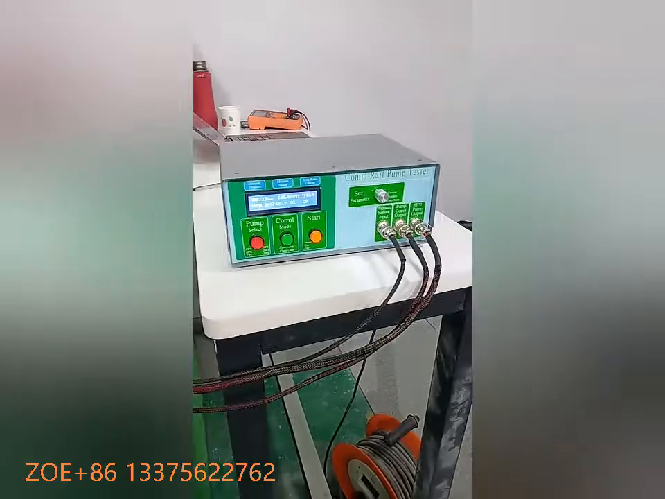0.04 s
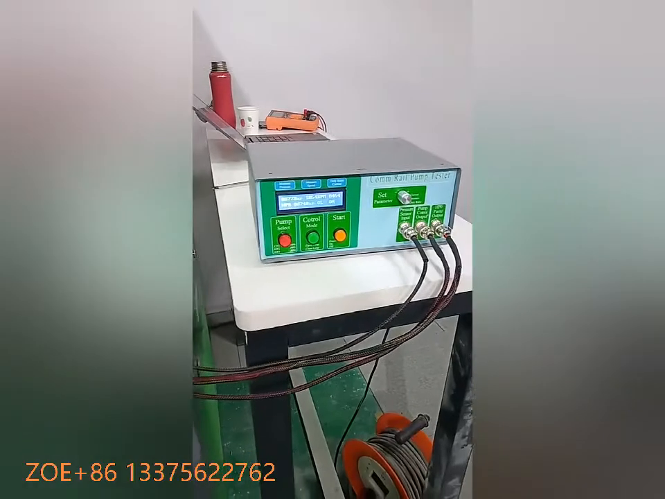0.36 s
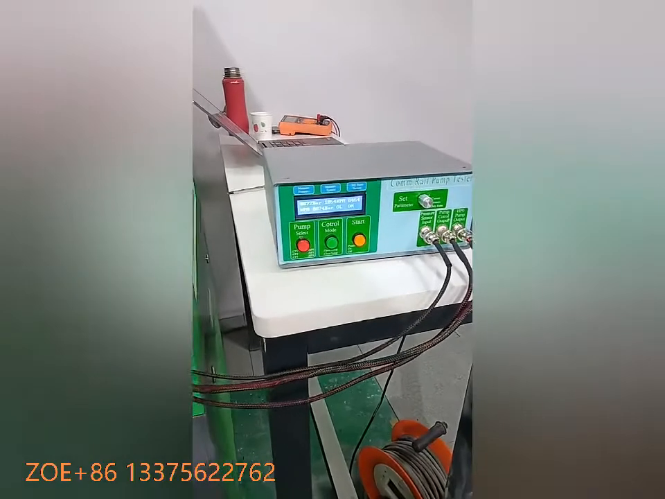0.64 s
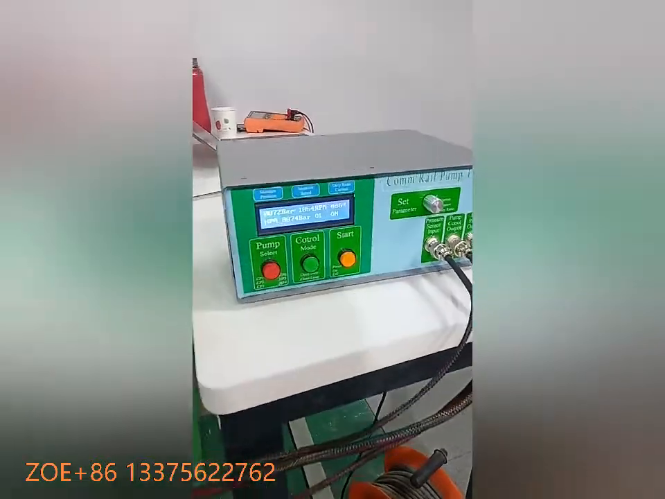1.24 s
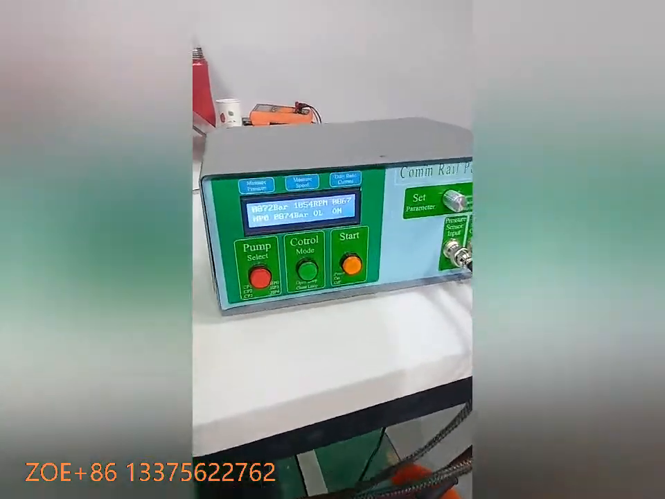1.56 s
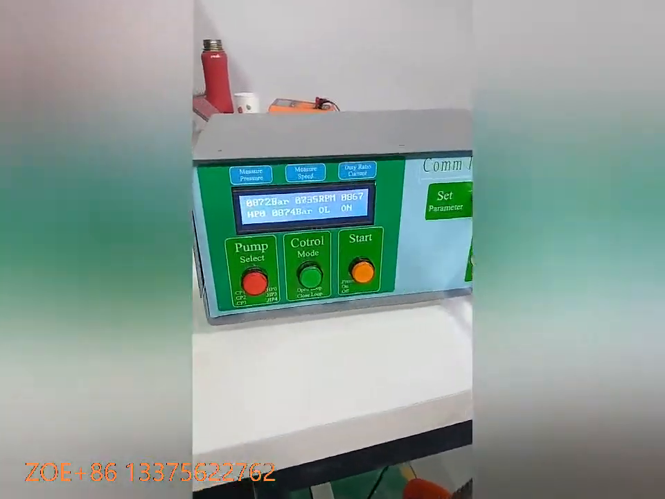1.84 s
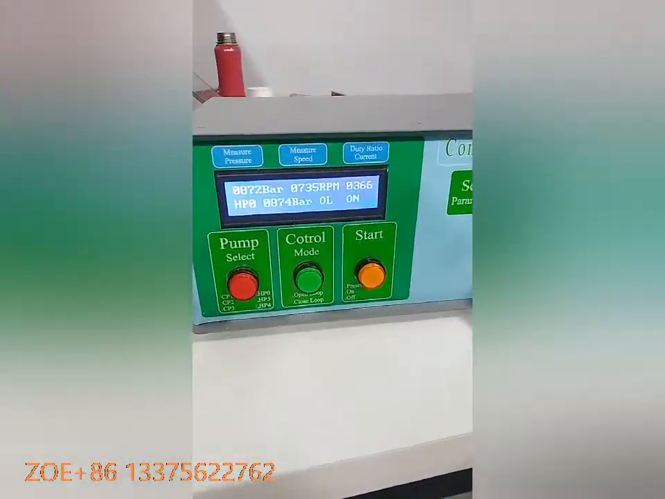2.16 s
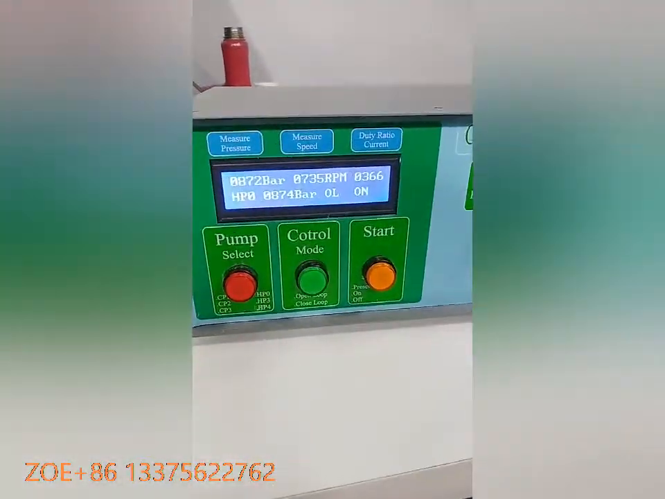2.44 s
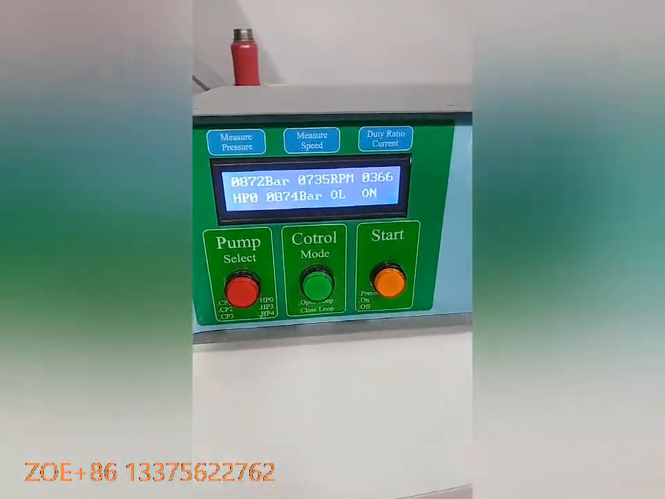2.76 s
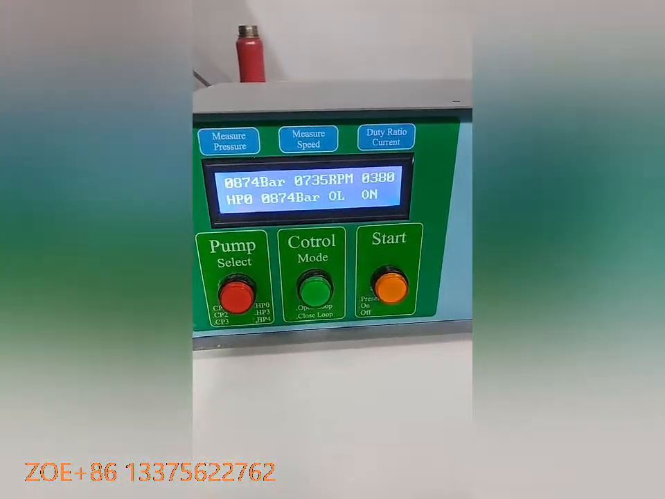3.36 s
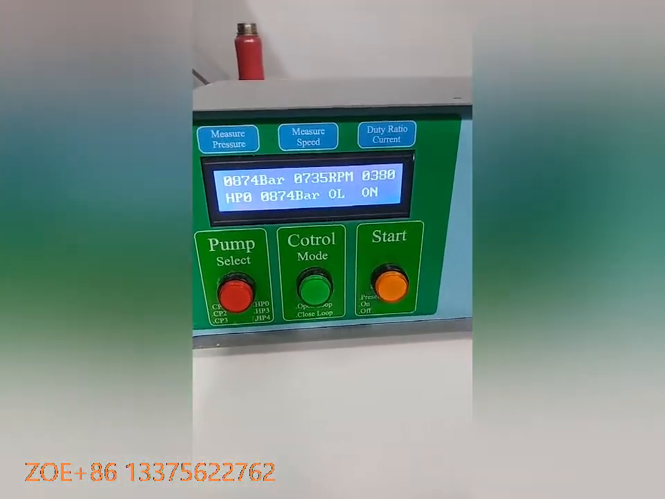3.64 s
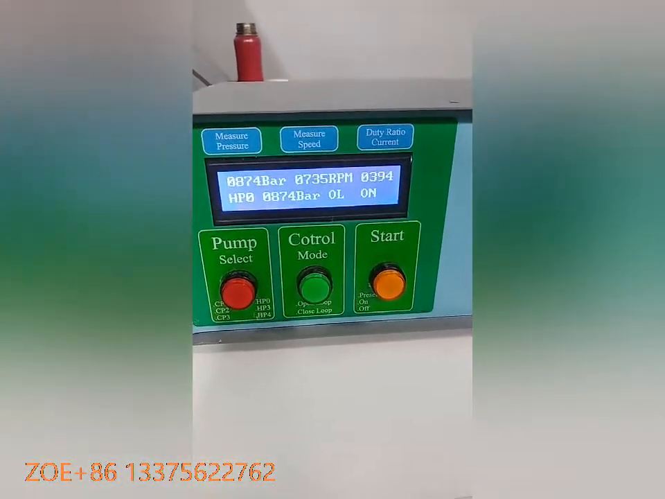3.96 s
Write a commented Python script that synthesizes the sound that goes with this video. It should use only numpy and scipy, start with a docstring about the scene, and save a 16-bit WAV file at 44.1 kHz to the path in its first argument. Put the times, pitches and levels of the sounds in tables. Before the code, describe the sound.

A test bench pump fades in during the first half second and drones at constant speed until the end at 4 seconds, with fast clatter, rattling, hiss and a thin high whine. Soft knocks come near 0.7, 1.9 and 2.6 seconds. Faint high squeaks occur around 0.9 and 1.5 seconds, and brief chirps mostly from 2 seconds on. The tone shifts slightly as the microphone moves closer.

```python
"""High-pressure pump on a test bench

A pump runs at constant speed in a workshop, heard by a listener who moves slowly closer. Harmonics
of the shaft rate drone, plungers and gears clatter alike on every turn, the housing rattles and the
bench panels resonate. Fuel hisses and chirps in the lines under a thin whine near 5 kHz, with a few
soft knocks and high squeaks. The sound fades in at the start."""
import sys
import numpy as np
from scipy import signal
from scipy.fft import rfft, irfft
from scipy.io import wavfile
from scipy.ndimage import uniform_filter1d

SR = 44100
rng = np.random.default_rng(int(sys.argv[2]) if len(sys.argv) > 2 else 0)


def file_out(sig):
    """Save sig as 16-bit WAV at sys.argv[1]."""
    # one column per channel
    cols = np.atleast_2d(sig).T
    # limit, then scale
    lim = np.clip(cols, -1, 1)
    pcm = np.round(lim * 32767).astype(np.int16)
    wavfile.write(sys.argv[1], SR, pcm)


N = 176400


def undb(db):
    """Amplitude ratio of a level in decibels."""
    return 10 ** (np.asarray(db) / 20)


def level(x, db):
    """Scaling to an rms level in dB."""
    return x * undb(db) / np.sqrt(np.mean(x ** 2))


def walk(rate):
    """Random modulation: values held 1 / rate seconds and smoothed twice, with a spread near 1."""
    hold = int(SR / rate)
    steps = rng.standard_normal(400)[np.arange(N) // hold % 400]
    return 1.3 * uniform_filter1d(uniform_filter1d(steps, hold), hold)


def colour(x, points):
    """Minimum-phase filter through (Hz, dB) points, made causal by folding the cepstrum."""
    hz, db = np.array(points, float).T
    f = np.maximum(np.fft.rfftfreq(N, 1 / SR), 1)
    gain = undb(np.interp(np.log(f), np.log(hz), db))
    cepstrum = irfft(np.log(gain), N)
    cepstrum[1:N // 2] *= 2
    cepstrum[N // 2 + 1:] = 0
    return irfft(rfft(x) * np.exp(rfft(cepstrum)), N)


def ring(hz, width_hz):
    """Narrow-band noise: one steep resonance under random excitation, at rms 1."""
    detuning = (np.fft.rfftfreq(N, 1 / SR) - hz) / (width_hz / 2)
    return level(irfft(rfft(rng.standard_normal(N)) / (1 + detuning ** 2), N), 0)


def swell(x, at, width):
    """Gaussian bump of height 1, two standard deviations wide."""
    return np.exp(-2 * ((x - at) / width) ** 2)


def stereo(mid, side):
    """Left and right as the sum and difference of mid and side."""
    return np.array([mid + side, mid - side])


def drone(turns, near, waver=.059):
    """Periodic motion radiates harmonics of the shaft rate; their balance depends on where one stands."""
    # Each row: shaft multiple (rounded in use), relative level in dB from afar, the same from close by.
    harmonics = [(5, -29, -18), (6, -3.5, -7), (7, -20, -19.5), (9, -18, -17.5), (10, -4, -7),
                 (11, -19, -22), (12, 0.5, 1), (15, -18, -13.5), (16, -9, -12), (17, -7, -10),
                 (18, -3.5, -8.5), (19, -17, -18), (20, -4.5, -12), (21, -11, -33), (22, -21, -20.5),
                 (23, -10, -10.5), (24, -4.5, -3), (25, -14, -15), (27, -27, -14.5), (28, -16, -19.5),
                 (30, -18.5, -19.5), (31, -20, -24), (34, -16, -15.5), (35, -17.5, -25), (42, -14.5, -19),
                 (57, -27, -25.5), (58, -27, -21), (90.56, -16.5, -17), (94.8, -22, -19), (132, -22, -14.5)]
    out = 0
    for multiple, far_db, near_db in harmonics:
        gain = undb(far_db + (near_db - far_db) * near) * (1 + waver * (walk(2.94) + 1j * walk(2.2)))
        cycles = round(multiple) * turns + rng.random()
        out = out + np.real(gain * np.exp(2j * np.pi * cycles))
    return level(out, db=-27.5)


def clatter(turns, sets=4, impacts=150, spread_db=3, mix_hz=.155):
    """Impacts at fixed shaft angles form periodic pulse trains; their mix shifts as the listener moves."""
    # Each row: frequency in Hz, relative spectral density in dB.
    spectrum = [(300, -36.5), (420, -1.5), (520, -9), (780, 1.5), (950, -3), (1250, -2.5), (1650, -3.5),
                (2000, -9), (2350, -9), (2850, -1), (3700, -5), (4500, -10), (5600, -14.5), (8000, -39)]
    samples = np.arange(N)
    whole_turns = np.arange(-1, turns[-1] + 1)[:, None]
    out = 0
    for k in range(sets):
        angle = rng.random(impacts)
        force = rng.choice([-1, 1], impacts) * undb(spread_db * rng.standard_normal(impacts))
        at = np.interp(whole_turns + angle, turns, samples, left=N, right=N).astype(int)
        hits = np.bincount(at.ravel(), np.tile(force, len(whole_turns)), N + 1)[:N]
        out = out + hits * np.cos(2 * np.pi * mix_hz * samples / SR + np.pi * k / sets)
    return level(colour(out, spectrum), db=-33.5)


def rattle(turns, ticks_per_s=5000, spread_db=2.5, strokes_per_turn=8, depth=.16):
    """Shot noise: dense random ticks in the housing, modulated in amplitude by the strokes."""
    # Each row: frequency in Hz, relative spectral density in dB.
    spectrum = [(20, -7), (45, -6.5), (80, -1), (150, 1.5), (240, 6.5), (330, 5), (410, -2.5), (540, -1.5),
                (780, -2.5), (1000, -0.5), (1280, 3.5), (1800, -5.5), (2050, -1), (2350, -11), (2850, 0.5),
                (3700, 1), (4500, -2.5), (5600, -7.5), (6900, -11), (8000, -23.5), (14000, -23)]
    ticks = (rng.random(N) < ticks_per_s / SR) * rng.choice([-1, 1], N)
    force = undb(spread_db * rng.standard_normal(N))
    phase = 2 * np.pi * strokes_per_turn * turns
    strokes = 1 + depth * (np.cos(phase) + np.cos(phase / 2 + 2 * np.pi * rng.random())) / 2
    return level(colour(ticks * force * strokes, spectrum), db=-31)


def panels(shake, near):
    """Forced vibration: the bench's sheet panels ring at their modes, clearer from close by."""
    # Each row: frequency in Hz, half-width in Hz, level in dB from afar, the same from close by.
    modes = [(766, 19, -65, -49), (1225, 28, -57, -49), (2890, 90, -58, -58), (3354, 37, -60, -51),
             (3725, 94, -55, -49.5)]
    f, drive = np.fft.rfftfreq(N, 1 / SR), rfft(shake)
    out = 0
    for hz, half_width, far_db, near_db in modes:
        ringing = irfft(drive / (1 + 1j * (f - hz) / half_width) ** 2, N)
        out = out + level(ringing, 0) * undb(far_db + (near_db - far_db) * near)
    return out


def hiss(flicker_db=1.5):
    """Flow noise of the fuel flickers finely; scattering in the room decorrelates it between the ears."""
    # Each row of both tables: frequency in Hz, relative spectral density in dB.
    mid_spectrum = [(2500, -40), (3900, -29), (4700, 3.5), (5600, 0), (6000, 0.5), (6350, 8.5), (6850, 4),
                    (7000, -5), (7500, -1), (7750, -6), (8700, -8.5), (10000, -7.5), (12000, -9.5),
                    (14000, -12.5)]
    side_spectrum = [(3900, -68), (4300, -8), (4700, -12), (5200, -1), (6300, 7.5), (6850, 7), (7000, -1),
                     (7500, -1), (7750, -4), (8700, -7.5), (10000, -5), (14000, -11)]
    mid = level(colour(rng.standard_normal(N), mid_spectrum), db=-39)
    side = level(colour(rng.standard_normal(N), side_spectrum), db=-40)
    return stereo(mid, side) * undb(flicker_db * walk(40.3))


def whine(t, focus_hz=70, floor=.45, waver=.25, side_gain=.5, flutter_db=1.1):
    """Close tones of the drive beat in narrow-band noise; the emphasis slides from tone to tone."""
    # Tones on a grid of four shaft multiples. Each row: frequency in Hz, level in dB before weighting.
    tones = [(4651, -58), (4812, -55), (4866, -49), (4920, -44), (4974, -42.5), (5027.5, -39.5),
             (5081, -51), (5135.5, -42)]
    # Each row: time in seconds, emphasised frequency in Hz, gain of the mid signal in dB.
    emphasis = [(.3, 4940, -3), (.6, 4940, 1.5), (.8, 5120, 0), (.98, 5020, 1), (1.12, 5020, -1),
                (1.22, 4920, -8), (1.42, 5060, 1), (1.6, 4980, -4.5), (1.8, 5000, 0.5), (1.92, 4980, -5.5),
                (2.12, 5050, 2), (2.25, 5130, -2), (2.36, 5010, 1), (2.6, 5070, 3.5), (2.74, 5080, 2.5),
                (2.98, 5050, 2), (3.15, 4850, 1), (3.45, 4990, -1.5), (3.68, 4860, -5.5), (4, 4930, -2)]
    times, centres, gains_db = np.array(emphasis).T
    centre = np.interp(t, times, centres)
    mid_gain = undb(np.interp(t, times, gains_db))
    mid, side = (undb(-46) * ring(hz=5030, width_hz=200) for _ in range(2))
    for hz, db in tones:
        focus = floor + (1 - floor) * swell(centre, hz, focus_hz)
        tone = np.sqrt(2) * undb(db) * focus * np.exp(2j * np.pi * (hz * t + rng.random()))
        mid = mid + np.real(tone * (1 + waver * (walk(3.66) + 1j * walk(3.7))))
        side = side + np.real(tone * (walk(2.3) + 1j * walk(1.8))) / np.sqrt(2)
    return stereo(mid_gain * mid, side_gain * side) * undb(flutter_db * walk(30.03))


def chirps(t, length_s=.02, width_hz=200):
    """The fuel flow chirps in short bursts of narrow-band noise."""
    # Each row: time of the peak in seconds, frequency in Hz, level in dB.
    bursts = [(.65, 6280, -43), (1.735, 6120, -47), (1.87, 6000, -43), (1.955, 6040, -39),
              (2.395, 6130, -36), (2.56, 6180, -43), (2.84, 6260, -49), (3.257, 6300, -37),
              (3.345, 6480, -36), (3.517, 6500, -44), (3.555, 6200, -40), (3.6, 6170, -47),
              (3.815, 6200, -39), (3.862, 6380, -35)]
    return sum(undb(db) * swell(t, at, length_s) * ring(hz, width_hz) for at, hz, db in bursts)


def knocks(t):
    """Briefly excited resonances give soft bumps and a tick, half masked by the drone."""
    # Each row: time of the peak in seconds, frequency in Hz, width in Hz, length in seconds, level in dB.
    bumps = [(0.7, 374, 70, 0.029, -34), (0.727, 2880, 300, .014, -29), (1.881, 412, 60, 0.039, -33),
             (2.573, 364, 60, .04, -35)]
    return sum(undb(db) * swell(t, at, length) * ring(hz, width) for at, hz, width, length, db in bumps)


def squeaks(t, hz=11290, width_hz=280, side_gain=.55):
    """A very high resonance, excited by noise, sings in short spells."""
    # Each row: time of the peak in seconds, length in seconds, level of the mid signal in dB.
    spells = [(.86, 0.031, -41.5), (0.936, 0.027, -39.5), (1.0, .08, -53), (1.42, .035, -46.5),
              (1.49, .04, -53), (1.582, 0.019, -38.5), (2.36, .04, -53), (3.99, .04, -45)]
    envelope = sum(undb(db) * swell(t, at, length) for at, length, db in spells)
    return envelope * stereo(ring(hz, width_hz), side_gain * ring(hz, width_hz))


def scene(shaft_hz=13.429, wander_turns=.0011, approach_mid_s=1.54, approach_scale_s=.74):
    """Superposition: one shaft times drone, clatter and rattle; the other sounds add around them."""
    # The machine's lean to the left ear. Each row: frequency in Hz, side relative to mid in dB.
    lean = [(60, -46), (170, -43.5), (350, -66), (750, -69), (1050, -26), (1250, -13), (1450, -31.5),
            (1750, -63), (4000, -74)]
    t = np.arange(N) / SR
    near = .5 + .5 * np.tanh((t - approach_mid_s) / approach_scale_s)  # 0 afar, 1 close by
    turns = shaft_hz * t + wander_turns * walk(2)
    regular, loose = clatter(turns), rattle(turns)
    machine = drone(turns, near) + regular + loose + panels(regular + .73 * loose, near)
    return stereo(machine, colour(machine, lean)) + hiss() + whine(t) + squeaks(t) + chirps(t) + knocks(t)


def record(dry, start_s=.1384, cutoff_hz=14200):
    """A gain envelope fades in from silence, and a steep elliptic low-pass limits the bandwidth."""
    # Each row: time in seconds, gain in dB.
    fade_points = [(.14, -23.5), (.19, -13.5), (.25, -8), (.32, -4), (.41, -1), (.9, -0.3), (2.2, -0.28),
                   (4, 0)]
    t = np.arange(N) / SR
    onset = np.clip((t - start_s) / .003, 0, 1)
    fade = undb(np.interp(t, *np.array(fade_points).T))
    low_pass = signal.ellip(12, .1, 90, cutoff_hz, fs=SR, output="sos")
    return signal.sosfilt(low_pass, dry * fade * onset)


dry = scene()
out = record(dry)
file_out(out)
```